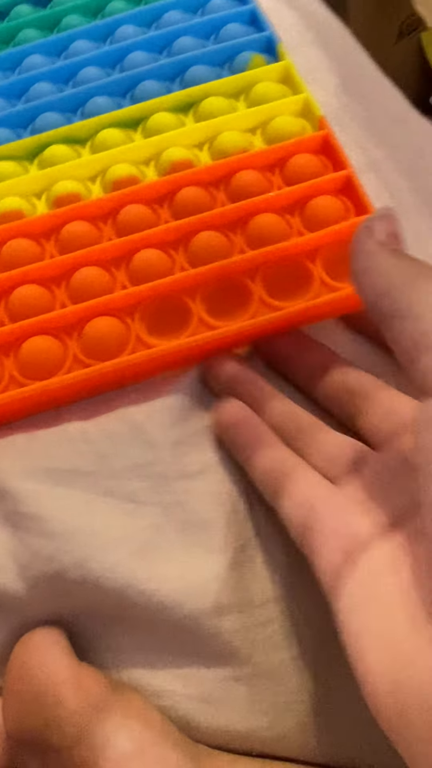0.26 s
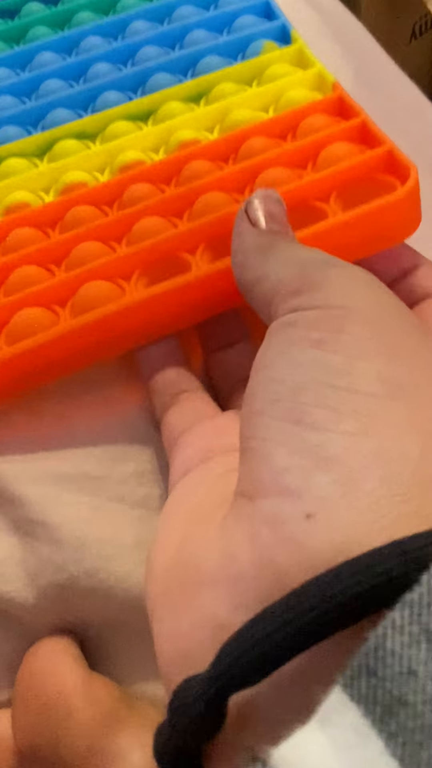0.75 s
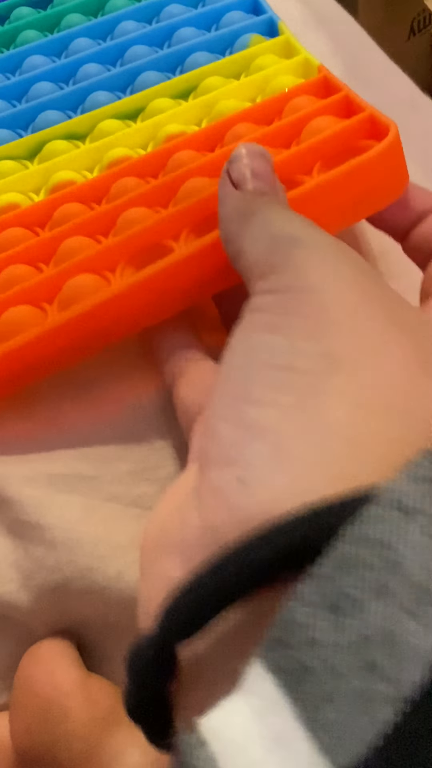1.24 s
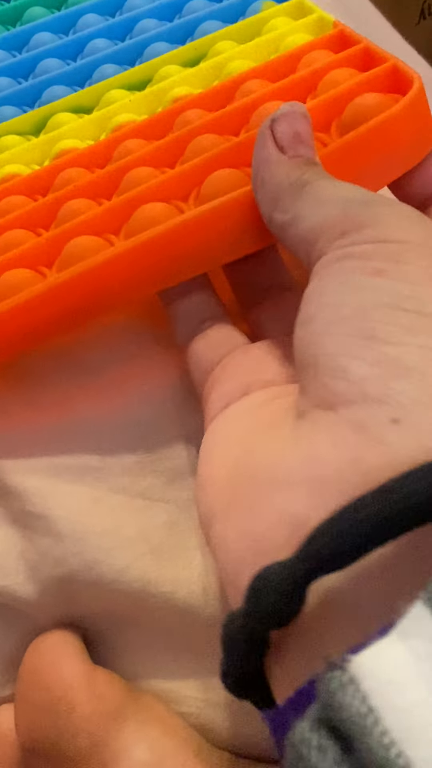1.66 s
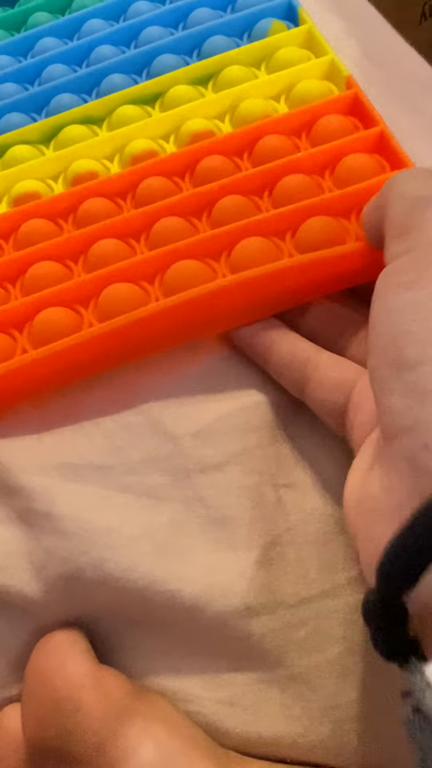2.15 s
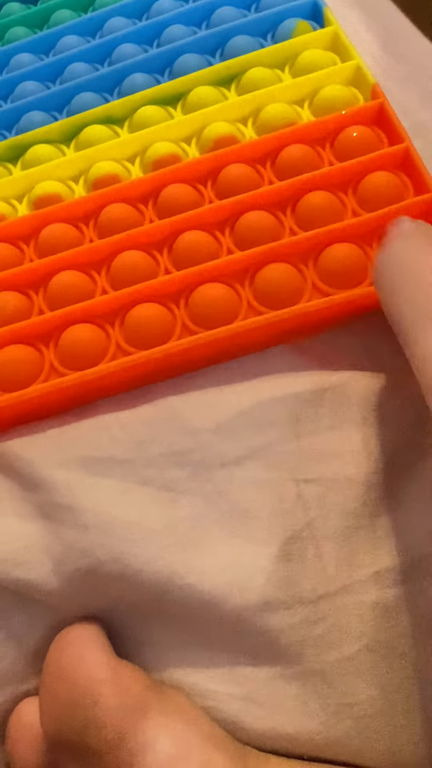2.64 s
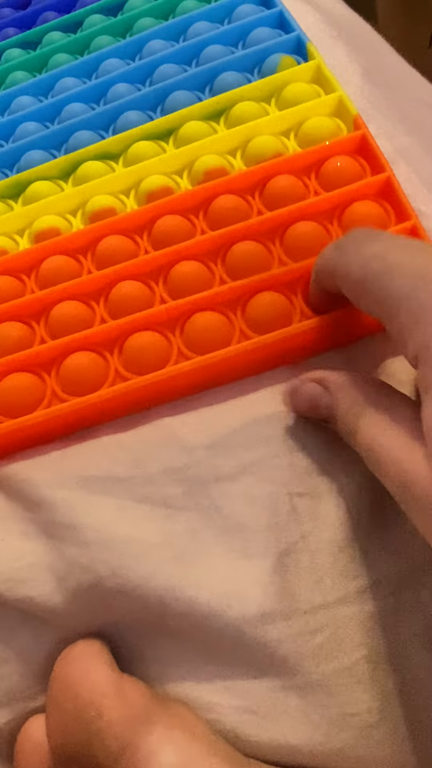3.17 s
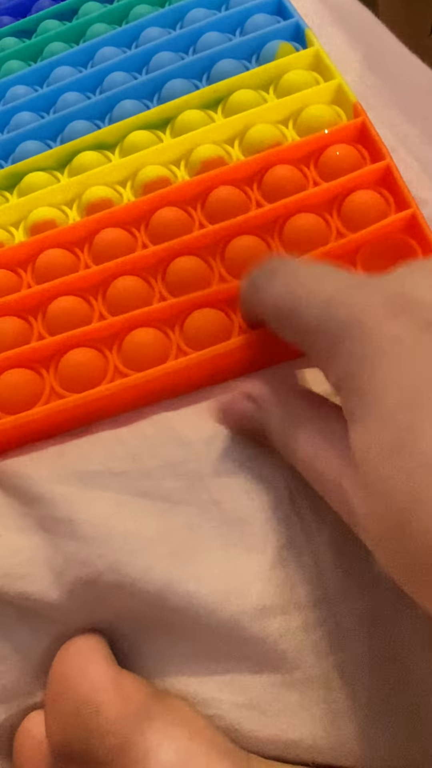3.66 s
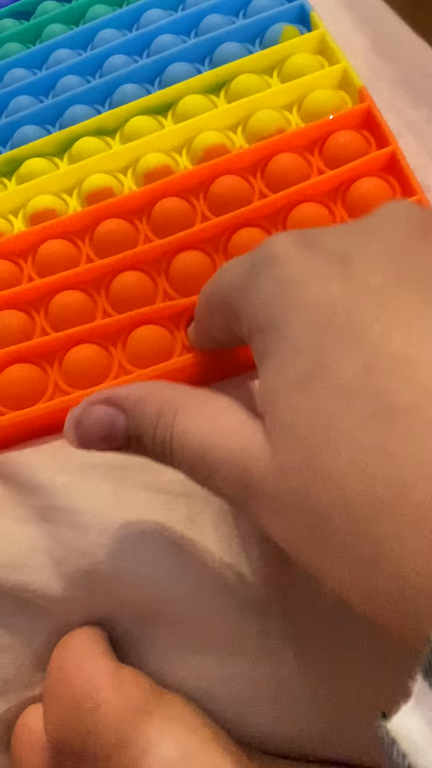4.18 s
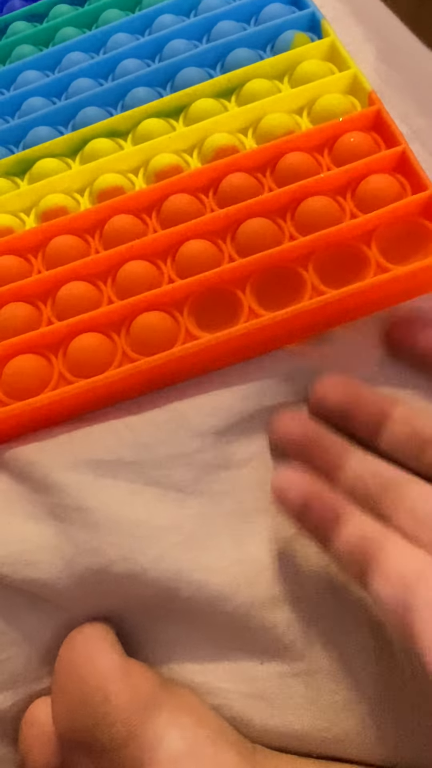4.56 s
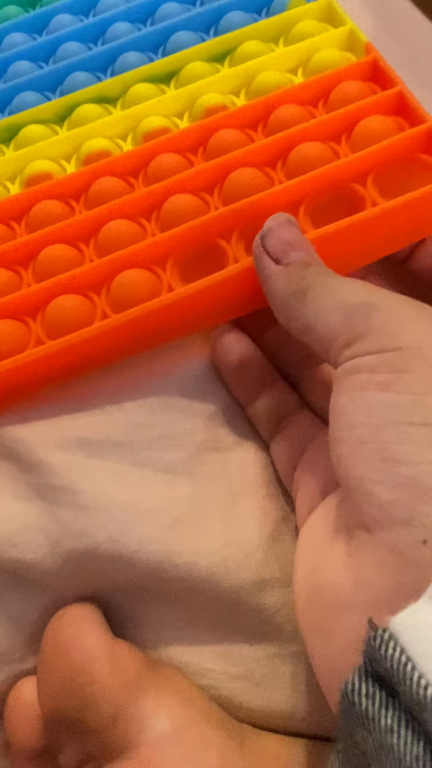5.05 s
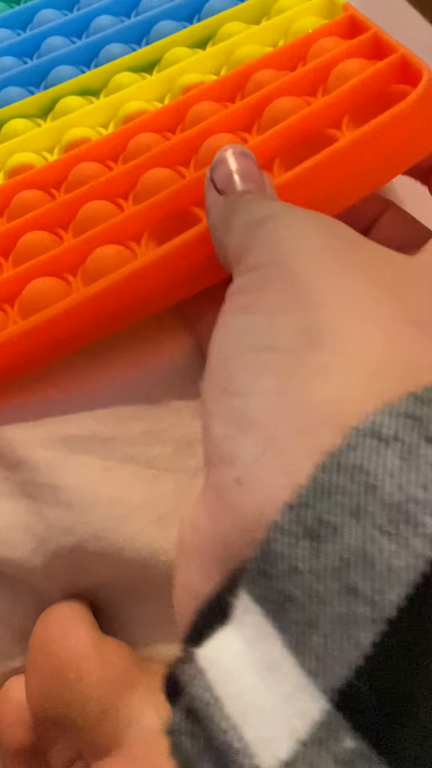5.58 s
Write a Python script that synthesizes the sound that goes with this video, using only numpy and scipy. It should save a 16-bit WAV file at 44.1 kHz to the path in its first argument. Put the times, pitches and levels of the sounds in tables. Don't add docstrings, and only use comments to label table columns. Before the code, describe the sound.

Very close, dry stereo sound of a rubbery fidget toy on cloth. Irregular muffled thumps carry through the sheet, mixed with short skin and sleeve brushes. The loudest moment is a cluster of sharp pops at about 1.5 to 1.6 seconds; later come groups of thuds near 2.3 and 3.7, a snap at 4.2, then quieter handling. Low ventilation rumble stays behind in a small soft room.

```python
import sys
import numpy as np
from scipy import signal
from scipy.fft import rfft, irfft, next_fast_len
from scipy.io import wavfile
from scipy.ndimage import map_coordinates

SR = 44100
rng = np.random.default_rng(int(sys.argv[2]) if len(sys.argv) > 2 else 0)


def inscribe(sig):
    pcm = np.round(np.clip(np.atleast_2d(sig).T, -1, 1) * 32767)
    wavfile.write(sys.argv[1], SR, pcm.astype(np.int16))


def undo_db(level):
    steps = np.asarray(level, float) / 20
    return 10 ** steps


N = 256662

# [t/s, peak level/dB, delay of biggest swing/ms, spread/log time, direction/sign]
FLIPS = [(0.4219, -28.5, 14.7, 0.38, -0.98), (0.5064, -33, 12.2, 0.52, -1), (0.8207, -25, 13.8, 0.55, 0.91),
         (0.8612, -33.5, 18, 0.36, 1), (1.3225, -34, 14.3, 0.56, -1), (2.041, -32.5, 15.7, 0.58, 1),
         (2.2736, -23.5, 17.3, 0.31, -1.16), (2.3077, -32.5, 23.5, 0.38, 0.88),
         (2.3978, -37, 21.6, 0.57, 1), (2.4762, -31, 24, 0.48, 1), (3.132, -31, 12.2, 0.48, 1),
         (3.6724, -24, 4.9, 0.43, -0.83), (3.7785, -35, 14, 0.39, 1), (3.8938, -30, 13.6, 0.44, -1.2),
         (4.1635, -33.5, 19.3, 0.16, -1.1), (5.2403, -27.5, 8.1, 0.64, 0.87),
         (5.3014, -35, 16, 0.37, -0.86)]
# [t/s, peak level/dB, delay/ms,
# spread/log time, direction/sign]
HAND_KNOCKS = [
    (.001, -37.5, 11.5, 0.47, 1),
    (0.398, -35.5, 22, 0.59, -1),
    (2.012, -46, 10, 0.92, 1),
    (2.704, -40, 9.5, 0.86, 1),
    (3.132, -27.5, 4.36, 0.36, -1),
    (3.669, -30, 19.2, 0.29, -1),
    (4.2245, -35, 6.2, 0.33, -1),
    (5.044, -42.5, 21.5, 0.52, -1),
    (5.125, -36.5, 20, 0.27, -1),
]
# [t/s, peak level/dB, cavity f/Hz, rim ring rel level/dB, edge ring rel level/dB]
RIM_SNAPS = [(0.1449, -32, 2360, -37, -23), (1.458, -27, 970, -1.5, -9.5), (1.5144, -9, 1470, -45, -11),
             (1.5705, -22.5, 1130, 0.5, -5.5), (1.5907, -13, 1600, -3.5, 3), (1.6969, -37, 1204, -4, 4),
             (1.7009, -33.5, 1560, -30, -8), (2.1942, -29, 3320, -24, -16), (2.689, -41.5, 2113, 0, -21.5),
             (3.6696, -28, 1500, -3, -12), (3.8063, -48.5, 2220, -18, -7), (3.9337, -45, 1610, -16, -13.5),
             (4.2229, -22.5, 1238, -38, 0), (4.222, -24, 3960, -20.5, -32.5),
             (1.5147, -19.5, 3030, -30.5, -30)]
# [f/Hz, level/dB, t60/s]
RIM_RING = [(2430, -3, 0.0051)]
# [f/Hz, level/dB, t60/s]
EDGE_RING = [(3400, -2, 0.0035), (4370, 0.5, .003), (5640, 8.5, 0.0014), (6650, -7.5, 0.0022)]
# [f/Hz, level/dB, t60/s]
WALL_RING = [(1500, -5.5, .006), (2450, -4, 0.0055)]
# [t/s, peak level/dB, dull-to-bright tilt/dB]
UNSTICKS = [(.071, -57, -2), (1.393, -61.5, 6), (1.433, -66.5, 2), (2.197, -61, -9), (2.6993, -37.5, 0),
            (2.694, -40, -7), (2.823, -49.5, 3), (3.132, -42.5, -4), (3.248, -67, 2), (3.535, -67, 10),
            (3.614, -57, -4), (3.846, -65, -2.5), (4.104, -69, -4), (4.355, -70, 6.5), (4.446, -66.5, 7),
            (4.598, -42.5, -7)]
# [t/s, peak level/dB, dull-to-bright tilt/dB]
RIM_CREAKS = [
    (1.5065, -39, -1),
    (1.524, -41, -3),
    (1.535, -42, -6),
    (1.5835, -37, 2),
    (1.588, -38, -7),
    (1.598, -39, -4),
    (4.2155, -50, 5),
    (4.233, -50, 5),
    (4.242, -52, 7),
]
# [t/s, peak level/dB, length/ms]
AIR_PUFFS = [(0.143, -49, 1.2), (1.459, -40, 0.73), (1.57, -40.5, .6), (1.699, -49, 2.4), (2.192, -43, 1.3),
             (3.13, -36.5, 0.97), (3.668, -43, .7), (4.225, -78, 0.43), (4.596, -39, 1.5),
             (1.5145, -53, 0.7), (1.591, -47, .8)]
# [f/Hz, level/dB, t60/s]
GAP_RING = [(8900, 9.5, 0.00057), (11800, -5.5, .002), (14500, -11.5, .002)]
# [t/s, peak level/dB, f/Hz, decay/cycles]
SHEET_BOOMS = [
    (.212, -31.5, 233, 2.1),
    (.298, -32, 310, 19),
    (.7745, -39, 760, 12),
    (1.0775, -40, 700, 4.3),
    (2.69, -38.5, 259, 27),
    (4.597, -36.5, 460, 8.5),
    (4.735, -38.5, 626, 7.3),
    (4.736, -36, 434, 13),
]
# [middle t/s, half length/s, level/dB, coarseness/dB]
HAND_STROKES = [(0.13, 0.056, -59, 1.5), (0.273, 0.11, -53, 1.5), (0.352, .03, -55, -0.5),
                (0.57, 0.12, -62.5, -0.5), (.66, .04, -71, 3.5), (2.208, 0.036, -67, 3),
                (0.973, 0.14, -74, 2), (1.177, .08, -91, 15), (1.313, 0.062, -67.5, -0.5),
                (1.751, 0.063, -80.5, 0.5), (2.008, 0.075, -95.5, -8), (2.118, 0.064, -60, -4.5),
                (2.37, 0.091, -65, -3.5), (2.527, 0.24, -66, -0.5), (2.675, 0.056, -57.5, 4.5),
                (2.8, 0.068, -69.5, 2.5), (2.976, 0.04, -75, -6.5), (3.157, 0.047, -63.5, -0.5),
                (3.292, 0.032, -78.5, -1), (3.41, 0.072, -83.5, 5), (3.535, 0.026, -81, -10.5),
                (3.797, 0.033, -73, -1.5), (4.409, 0.045, -73, -1.5), (4.557, 0.059, -62.5, -5.5),
                (4.693, 0.095, -53, 2), (4.922, 0.09, -61.5, -2), (5.313, 0.092, -66, 1),
                (5.443, 0.11, -72.5, -7), (5.57, 0.11, -69, -3.5), (5.83, 0.031, -65, -5)]
# [t/s, level/dB, coarseness/dB, dying time/s]
TOY_SHUDDERS = [
    (.778, -83, 16, .08),
    (1.461, -68.5, 10.5, 0.1),
    (1.517, -67.5, 13.5, 0.24),
    (1.593, -64, 6, .15),
    (1.7, -65.5, 4, 0.043),
    (3.67, -67, 5.5, 0.11),
    (3.936, -74.5, 4.5, 0.12),
    (4.221, -65.5, -2.5, 0.13),
    (4.603, -52.5, 3.5, 0.25),
]
# [f/Hz, density/dB per Hz]
HISS_SPECTRUM = [(2400, -22), (3300, 2.5), (4500, 2), (5800, 6), (7500, 2), (9500, 0), (12000, -7),
                 (13500, -20), (15500, -10.5), (16200, -55)]
# [f/Hz, density/dB per Hz]
AIR_SPECTRUM = [(9800, -31), (11200, -2), (12800, -4), (14000, -8.5), (15300, -11), (16200, -38)]
# [f/Hz, density/dB per Hz]
SCRAPE_SPECTRUM = [(700, -23), (1150, 1), (1600, -5.5), (2250, 0.5), (2800, -6), (3600, -34)]
# [f/Hz, density/dB per Hz]
DRAG_SPECTRUM = [(130, -25.5), (220, 3.5), (330, 14), (600, 2.5), (850, 0), (1200, -40.5)]
# [t/s, f/Hz, level/dB]
SKIN_SQUEAK = [
    (1.1, 4900, -110),
    (1.14, 4850, -74),
    (1.19, 4600, -77),
    (1.21, 4800, -76),
    (1.24, 4600, -78),
    (1.27, 4600, -110),
]
# [f/Hz, density/dB per Hz]
VENT_MID = [(14, -36.5), (30, -11.5), (55, 5.5), (86, 2), (128, -8.5), (165, -3.5), (228, -1.5), (397, -6),
            (520, -16.5), (640, -36), (935, -37), (2260, -47.5), (3000, -54), (6000, -64.5), (9000, -89)]
# [f/Hz, density/dB per Hz]
VENT_SIDE = [(14, -58), (22, -17), (70, 0), (162, -2), (396, -6), (519, -7), (778, -10.5), (1340, -18.5),
             (1700, -31.5), (2350, -28), (3800, -34.5), (6000, -55.5), (12000, -51), (14000, -69.5)]
# [f/Hz, left minus right level/dB]
VENT_LEAN = [(60, 5), (110, -3), (200, -3), (380, -4.5), (700, -0.5), (1290, 1.5), (2380, 0), (4400, -2.5),
             (8120, 3.5), (15000, 5.5)]
# [f/Hz, wander/Hz, level/dB]
MOTOR_HUM = [(85, 5.0, -54.5), (119.25, .6, -54), (397.2, 1.54, -63)]
# [f/Hz, width/Hz, level/dB]
HOUSING_DIPS = [(2800, 130, -3.5), (4900, 300, -3.5)]

SNAP_SPREAD, SNAP_SPREAD_HZ, SNAP_SPREAD_LAW = 0.25, 1300, -0.83
RUB_LAG_SAMPLES = 2.24
STROKE_END_DB, STROKE_SQUARENESS = -10, 1.44
SHUDDER_RISE_S, SHUDDER_FALL_DB = 0.032, -24.5
REST_DB, DRAG_REST_DB = -90, -64
VENT_MID_DB, VENT_SIDE_DB = -48, -55
ROOM_T60_S, ROOM_DB = 0.16, -27
MIC_CUT_HZ, MIC_TOP_HZ = 40, 16700


def bending_wave(t, delay_s, spread, turns):
    u = np.log(t / delay_s)
    return np.cos(2 * np.pi * turns * u) * np.exp(-u ** 2 / (2 * spread ** 2))


def thuds():
    length = 8000
    out, t = np.zeros(N + length), np.arange(1, length + 1) / SR
    for s, db, delay_ms, spread, way in list(FLIPS) + list(HAND_KNOCKS):
        i = round(s * SR)
        wave = bending_wave(t, delay_ms / 1000, spread, turns=1.153)
        out[i:i + length] += np.sign(way) * undo_db(db) * wave
    return out[:N]


def ring(push, hz, t60_s):
    r, w = undo_db(-60 / (t60_s * SR)), 2 * np.pi * hz / SR
    return signal.lfilter([0, np.sin(w)], [1, -2 * r * np.cos(w), r * r], push + 1e-18)


def rings(push, modes):
    out = 0
    for k, (hz, db, t60_s) in enumerate(modes):
        out = out + (-1) ** k * undo_db(db) * ring(push, hz, t60_s)
    return out / np.max(np.abs(out))


def bursts(count, buckle_ms):
    t = np.arange(1, 1501) / SR
    rag = rng.standard_normal((count, 1500)) * np.exp(-(t * 1000 / buckle_ms - 1.5) ** 2)
    return t, rag / np.sqrt(np.sum(rag ** 2, axis=1, keepdims=True))


def snaps():
    out = np.zeros(N + 1500)
    t, pushes = bursts(len(RIM_SNAPS), buckle_ms=0.3)
    for (s, db, hz, rim_db, edge_db), ragged in zip(RIM_SNAPS, pushes):
        spread = SNAP_SPREAD * (hz / SNAP_SPREAD_HZ) ** SNAP_SPREAD_LAW
        delay_s = 1.9 / (1.3 * hz)
        wave = -bending_wave(t, delay_s, spread, turns=1.9)
        cavity = ring(wave, hz, 8 / hz)
        crack = 0.5 * ragged
        crack[round(0.75 * delay_s * SR)] -= 1
        pop = wave + 0.5 * cavity / np.max(np.abs(cavity))
        pop += undo_db(rim_db) * rings(wave, RIM_RING)
        pop += undo_db(edge_db) * rings(crack, EDGE_RING)
        i = round(s * SR)
        out[i:i + 1500] += undo_db(db) * pop
    return out[:N]


def ticks():
    out = np.zeros(N + 1500)
    events = list(UNSTICKS) + list(RIM_CREAKS)
    _, pushes = bursts(len(events), buckle_ms=0.28)
    for (s, db, tilt_db), push in zip(events, pushes):
        dull = undo_db(db - tilt_db) * rings(push, WALL_RING)
        bright = undo_db(db + tilt_db) * rings(push, EDGE_RING)
        i = round(s * SR)
        out[i:i + 1500] += dull + bright
    return out[:N]


def puffs():
    out = np.zeros(N + 1500)
    for s, db, length_ms in AIR_PUFFS:
        _, (push,) = bursts(1, length_ms)
        i = round(s * SR)
        out[i:i + 1500] += undo_db(db) * rings(push, GAP_RING)
    return out[:N]


def booms():
    out = np.zeros(N)
    for s, db, hz, cycles in SHEET_BOOMS:
        push = np.zeros(N)
        push[round(s * SR)] = 1
        boom = ring(ring(push, hz, cycles / hz), hz * 1.177, cycles / hz)
        out += undo_db(db) * boom / np.max(np.abs(boom))
    return out


def ports(x, lag_samples):
    size = next_fast_len(N + 64)
    turn = np.exp(-2j * np.pi * np.fft.rfftfreq(size) * lag_samples)
    return np.array([x, irfft(rfft(x, size) * turn, size)[:N]])


def rms_one(x):
    return x / np.sqrt(np.mean(x ** 2) + 1e-20)


def at_hz(points, hz):
    f, db = np.transpose(points)
    return np.interp(np.log(hz + 1), np.log(f), db)


def coloured(spectrum):
    size = next_fast_len(N)
    hz = np.fft.rfftfreq(size, 1 / SR)
    white = rfft(rng.standard_normal(size))
    return rms_one(irfft(white * undo_db(at_hz(spectrum, hz)), size)[:N])


def drift(rate_hz):
    r = np.exp(-80 * np.pi * rate_hz / SR)
    slow = signal.lfilter([1], [1, -2 * r, r * r], rng.standard_normal(N // 40 + 2002))[2000:]
    return np.interp(np.arange(N) / 40, np.arange(len(slow)), rms_one(slow))


def contact(coarse_share, shudder_db=0):
    t, power = np.arange(0, N, 32) / SR, undo_db(2 * REST_DB)
    for s, half_s, db, coarse_db in HAND_STROKES:
        fade_db = STROKE_END_DB * np.abs((t - s) / half_s) ** STROKE_SQUARENESS
        power = power + undo_db(2 * (db + coarse_share * coarse_db + fade_db))
    for s, db, coarse_db, dying_s in TOY_SHUDDERS:
        away = np.where(t < s, (s - t) / SHUDDER_RISE_S, (t - s) / dying_s)
        power = power + undo_db(2 * (db + shudder_db + coarse_share * coarse_db + SHUDDER_FALL_DB * away))
    return np.interp(np.arange(N) / SR, t, 10 * np.log10(power))


def rubbed(spectrum, level_db, alike, grain_db, slip_db):
    spot = ports(coloured(spectrum), RUB_LAG_SAMPLES)
    spread = np.array([coloured(spectrum), coloured(spectrum)])
    catch_db = grain_db * drift(17) + slip_db * drift(110)
    return undo_db(level_db + catch_db) * (np.sqrt(alike) * spot + np.sqrt(1 - alike) * spread)


def patchy(x, patch_db):
    hz, t, z = signal.stft(x, SR, nperseg=512)
    field = rng.standard_normal((24, len(t) // 8 + 2))
    place = np.meshgrid(23 * np.sqrt(hz / hz[-1]), np.arange(len(t)) / 8, indexing="ij")
    gain = undo_db(patch_db * map_coordinates(field, place, order=1))
    return signal.istft(z * gain, SR, nperseg=512)[1][:, :N]


def rubbing():
    hiss = rubbed(HISS_SPECTRUM, contact(0) + 2.0, alike=1.0, grain_db=1.44, slip_db=1.1)
    air_db = contact(0, shudder_db=-16.5) - 18.5
    air = rubbed(AIR_SPECTRUM, air_db, alike=0.11, grain_db=-0.7, slip_db=-0.6)
    scrape = rubbed(SCRAPE_SPECTRUM, contact(0.92) + 1.5, alike=0.27, grain_db=1.5, slip_db=1.2)
    drag_db = 10 * np.log10(undo_db(2 * (contact(1) + 3.0)) + undo_db(2 * DRAG_REST_DB))
    drag = rubbed(DRAG_SPECTRUM, drag_db + 1.56, alike=0, grain_db=1.8, slip_db=1.2)
    return patchy(hiss + air + scrape + drag, patch_db=2.2)


def squeak():
    s, f, level = np.transpose(SKIN_SQUEAK)
    t = np.arange(N) / SR
    hz, db = np.interp(t, s, f), np.interp(t, s, level)
    wobble_hz = 300 * drift(150)
    return undo_db(db) * drift(120) * np.sin(2 * np.pi * np.cumsum(hz + wobble_hz) / SR)


def ventilation():
    mid = undo_db(VENT_MID_DB + 1.2 * drift(12)) * coloured(VENT_MID)
    side = undo_db(VENT_SIDE_DB + 5.5 * drift(3.9)) * coloured(VENT_SIDE)
    for hz, wander_hz, db in MOTOR_HUM:
        phase = 2 * np.pi * np.cumsum(hz + wander_hz * drift(5.55)) / SR
        mid += undo_db(db) * np.sqrt(2) * np.sin(phase)
    hz = np.fft.rfftfreq(N, 1 / SR)
    lean = undo_db(at_hz(VENT_LEAN, hz) / 2 * np.array([[1], [-1]]))
    return irfft(rfft(np.array([mid + side, mid - side])) * lean, N)


def bedroom(x):
    t = np.arange(SR // 2) / SR
    tail = rng.standard_normal((2, len(t))) * undo_db(-60 * t / ROOM_T60_S)
    tail *= np.clip(t / 0.006 - 1, 0, 1)
    tail = signal.lfilter([0.2], [1, -0.8], tail)
    tail /= np.sqrt(np.sum(tail ** 2, axis=1, keepdims=True))
    return undo_db(ROOM_DB) * signal.fftconvolve(tail, x[None], axes=1)[:, :N]


def scene():
    sharp = snaps() + ticks()
    sharp = signal.sosfilt(signal.butter(3, [330, 8500], "band", fs=SR, output="sos"), sharp)
    sharp = signal.sosfilt(signal.butter(6, 9000, fs=SR, output="sos"), sharp)
    near = ports(sharp, 2.1) + ports(puffs(), 2.48) + ports(thuds() + booms(), 13.0)
    return near + bedroom(sharp) + rubbing() + squeak() + ventilation()


def top_cut(x):
    return signal.sosfilt(signal.butter(12, 16410, fs=SR, output="sos"), x)


def record(dry):
    x = signal.sosfilt(signal.butter(2, MIC_CUT_HZ, "high", fs=SR, output="sos"), dry)
    x = signal.sosfilt(signal.cheby2(10, 60, MIC_TOP_HZ, fs=SR, output="sos"), x)
    for hz, width_hz, db in HOUSING_DIPS:
        x = x - (1 - undo_db(db)) * signal.lfilter(*signal.iirpeak(hz, hz / width_hz, SR), x)
    return top_cut(x)


dry = scene()
out = record(dry)
inscribe(out)
```